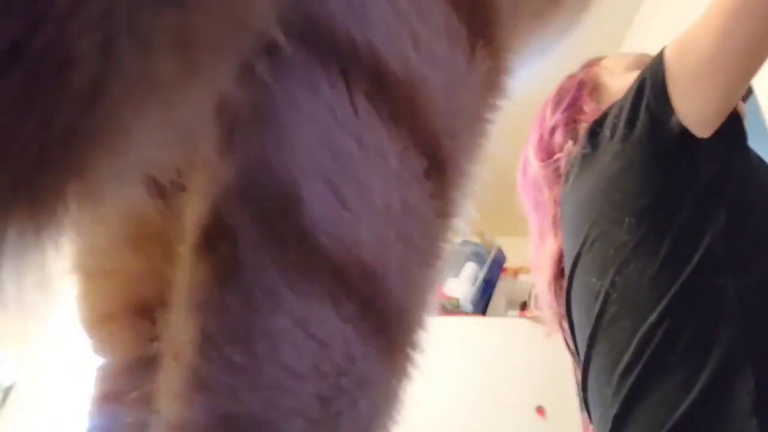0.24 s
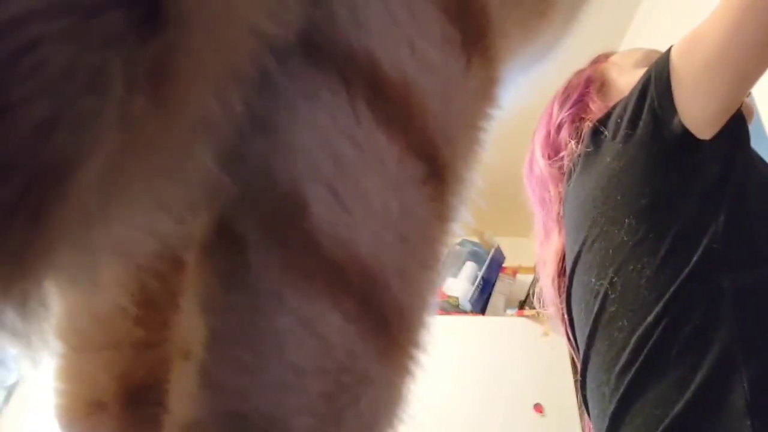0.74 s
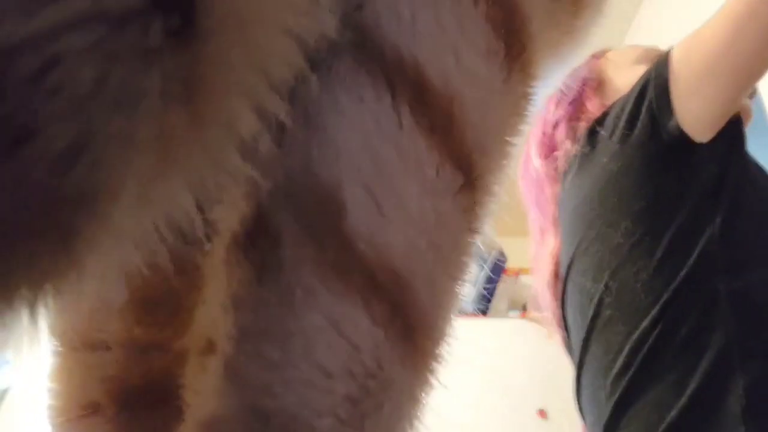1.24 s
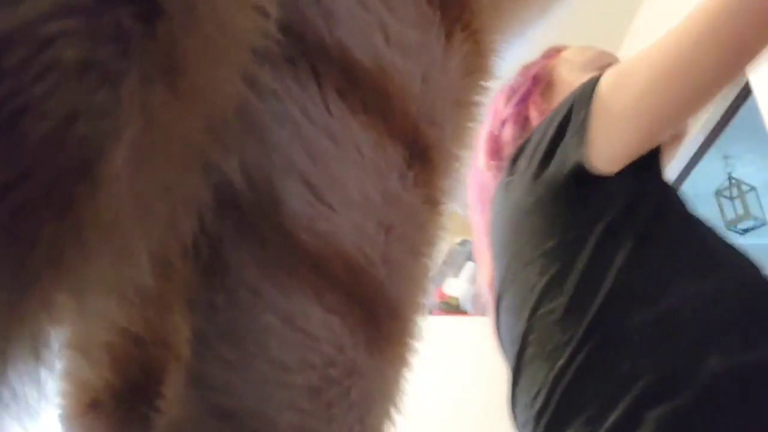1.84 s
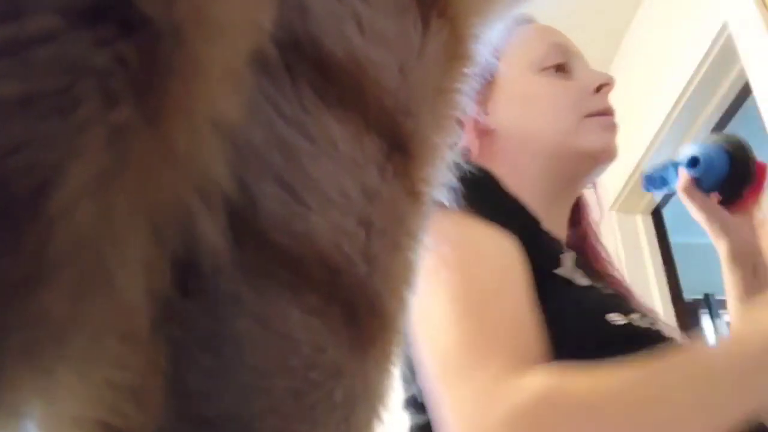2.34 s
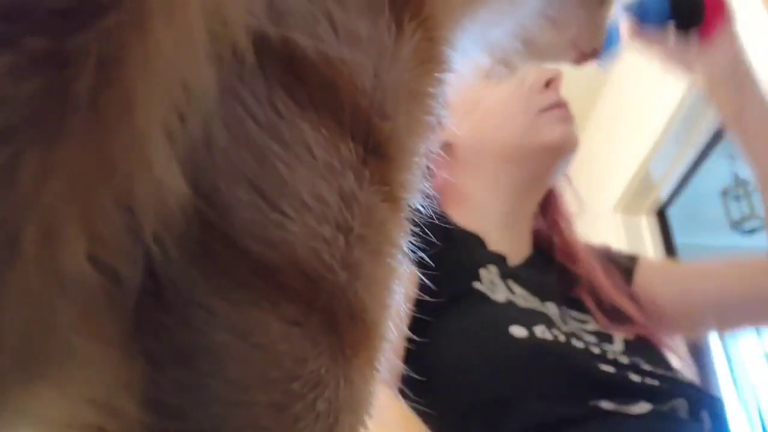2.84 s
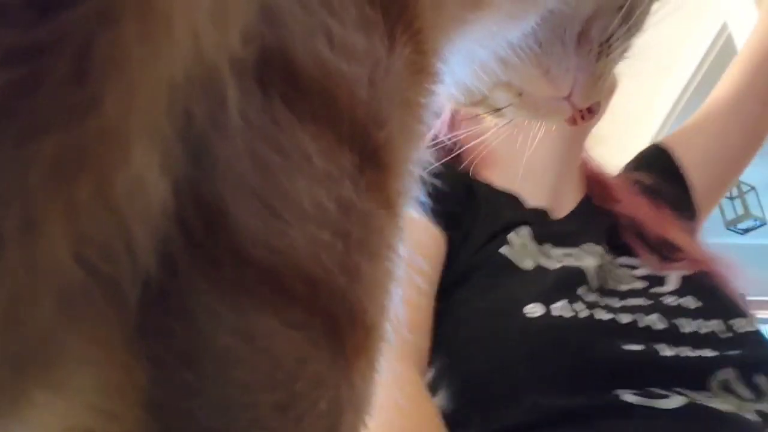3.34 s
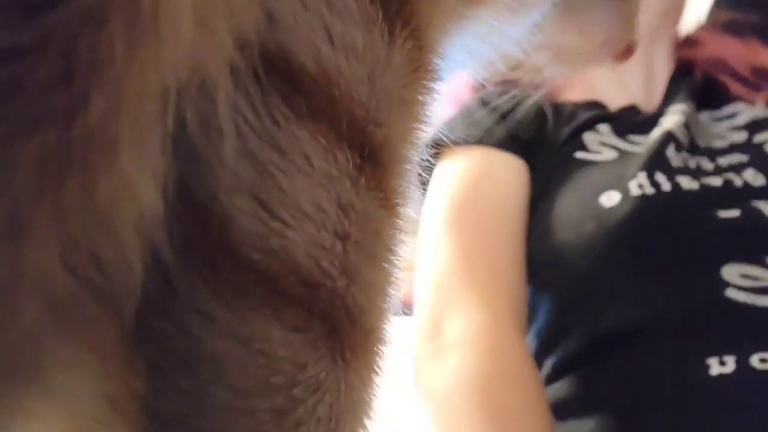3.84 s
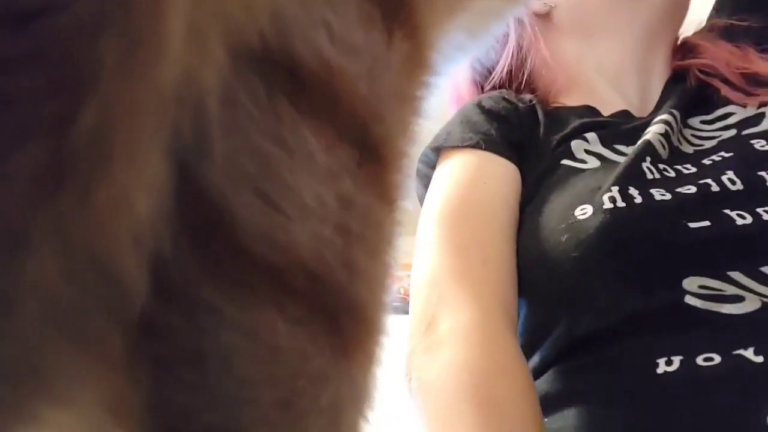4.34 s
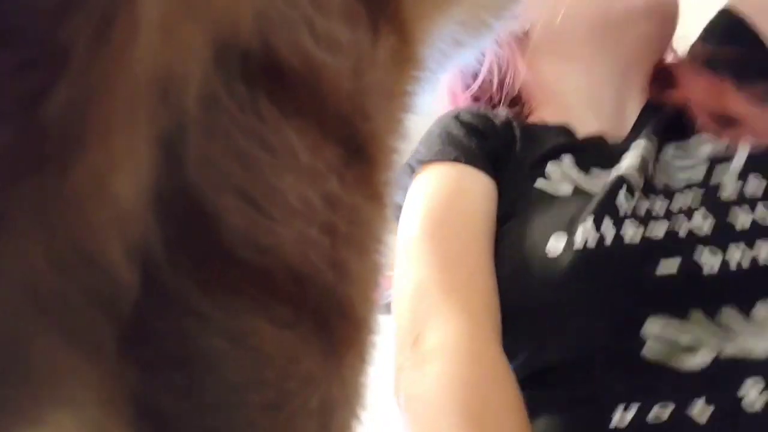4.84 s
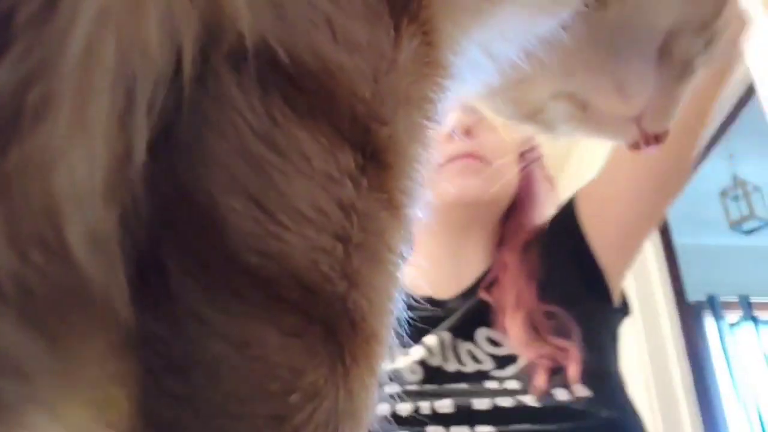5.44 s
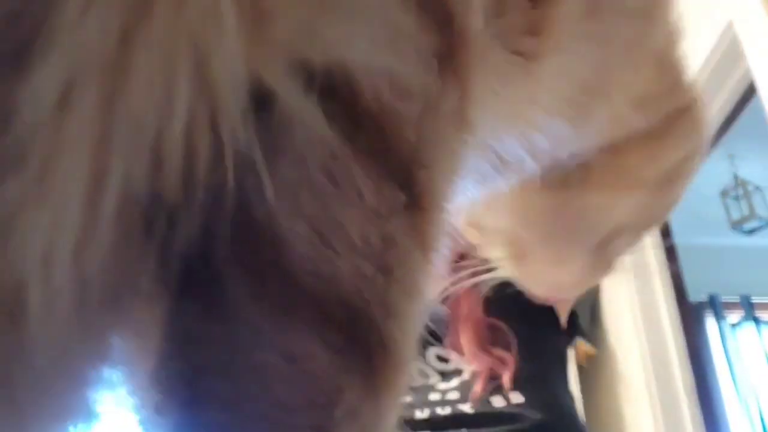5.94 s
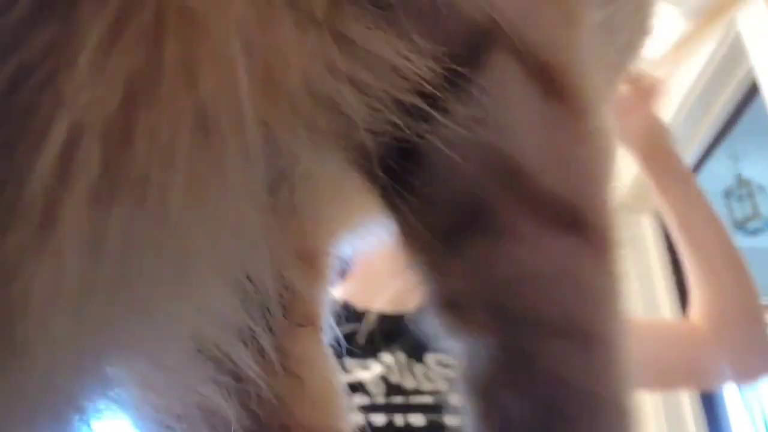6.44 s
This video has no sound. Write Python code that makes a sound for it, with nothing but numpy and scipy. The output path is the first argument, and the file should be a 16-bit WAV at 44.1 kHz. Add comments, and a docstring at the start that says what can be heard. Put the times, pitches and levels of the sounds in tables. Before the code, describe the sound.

A steady low appliance hum and rumble lie under everything in a small kitchen, with a cupboard being rummaged a step from the microphone. At about 0.5 s a cup clinks softly. From 0.35 to 1.1 s a jar is pushed along the shelf in short gritty slides, with a thin, fluttering high squeal swelling until it lands at 1.1 s in a quick hard cluster of knocks. Squeaky remnants and a glass clink follow near 1.3 s, with gentler glass taps at 1.6 and 1.8 s. A faint airy rush begins at 1.6 s and holds through a lull until about 4.3 s, with a dull tap at 2.05 s and tiny ticks. Scuffs at 4.3 s lead to a bowl knock at 4.55 s and the loudest dish clatter at 4.67 s, settling by 4.85 s. Small ticks at 5.0 s, dull wooden knocks at 5.1 and 5.4 s, then fading soft scuffs.

```python
"""Kitchen cupboard, a step from the microphone: someone rummages inside while an appliance hums throughout.
A cup clinks, a jar squeals along the shelf and is set down beside a glass; later a bowl knocks into stacked
dishes, which clatter and settle, and the wood takes dull knocks. Blows sum beating modes and a dense noise
ring; sliding is random clicks through drifting resonances; scuffs, rumble and an airy rush are shaped noise."""
import sys
import numpy as np
from scipy import signal
from scipy.fft import rfft, irfft
from scipy.io import wavfile

SR = 44100
rng = np.random.default_rng(int(sys.argv[2]) if len(sys.argv) > 2 else 0)


def inscribe(sig):
    """Save sig as 16-bit PCM at rate SR to the path in sys.argv[1].

    A 1-D sig is mono; a 2-D sig holds one channel per row.
    Samples are clipped to [-1, 1] before scaling.
    """
    pcm = np.round(np.clip(np.atleast_2d(sig).T, -1, 1) * 32767)
    wavfile.write(sys.argv[1], SR, pcm.astype(np.int16))


N = 294588
TIME = np.arange(N) / SR
EDGE_HZ = 15900  # upper band limit


def amp(db):
    """Decibels to gain."""
    return 10 ** (np.asarray(db) / 20)


def evened(x):
    """Scales to an rms of one."""
    return x / np.sqrt(np.mean(x ** 2) + 1e-20)


def struck(x, attack_samples=1100):
    """Scales a blow so that its attack has an rms of one."""
    return x / np.sqrt(np.mean(x[:, :attack_samples] ** 2) + 1e-20)


def read(points, hz):
    """Reads a table on a log-frequency axis."""
    f, value = np.transpose(points)
    return np.interp(np.log(hz + 1), np.log(f + 1), value)


def add(mix, start_s, sound):
    """Mixes in a stereo sound at its start time."""
    part = mix[:, max(round(start_s * SR), 0):][:, :sound.shape[1]]
    part += sound[:, :part.shape[1]]


def wander(size, order):
    """Smooth chance of rms one, changing over about `order` steps."""
    return evened(signal.oaconvolve(rng.standard_normal(size), signal.windows.hann(order), "same"))


def stroke(start_s, length_s, db, rise_s, release_s):
    """Gain of one movement: builds up linearly, holds to the end of its length, dies away exponentially."""
    attack = np.clip((TIME - start_s) / rise_s, 0, 1)
    return amp(db) * attack * np.exp(-np.maximum(TIME - start_s - length_s, 0) / release_s)


# left-right likeness of the microphone pair: [f/Hz, correlation]
LIKENESS = [(100, .99), (350, .96), (700, .8), (1500, .5), (4000, .3), (12000, .1)]


def paired(x, colour):
    """Colours two unrelated signals and makes them alike in the bass, as two close ports hear a room."""
    hz = np.fft.rfftfreq(x.shape[1], 1 / SR)
    a, b = rfft(x)
    same = np.clip(read(LIKENESS, hz), -1, 1)
    mid, side = a * np.sqrt(1 + same), b * np.sqrt(1 - same)
    ports = np.array([mid + side, mid - side])
    return evened(irfft(ports * amp(read(colour, hz)), x.shape[1]))


def noise(colour):
    """Steady stereo noise of a given spectrum."""
    return paired(rng.standard_normal((2, N)), colour)


# how far minor modes stand out; in the bass, well spaced, only the main ones count: [f/Hz, rms depth/dB]
MINOR_MODE_DB = [(200, 1.5), (1500, 4), (3500, 6.2), (12000, 7)]


def crowd(size=32768, order=48):
    """Gain over frequency of the many narrow minor modes that one thing owns."""
    depth_db = read(MINOR_MODE_DB, np.fft.rfftfreq(size, 1 / SR))
    return amp(depth_db * np.clip(wander(size // 2 + 1, order), -2, 2))


# decay inside the cupboard, before each thing's damping factor: [f/Hz, t60/s]
CUPBOARD_T60 = [(100, 0.3), (400, 0.2), (1500, 0.19), (5000, 0.092), (12000, 0.16)]
# decay out in the kitchen: [f/Hz, t60/s]
KITCHEN_T60 = [(150, 0.72), (1000, 0.49), (4000, 0.49), (12000, 0.27)]


def wash(colour, minor_modes, damping, room_db, size=32768):
    """Crowded modes and reflections: a quick cupboard decay, then the kitchen's faint tail."""
    source = paired(rng.standard_normal((2, size)), colour)
    steady = irfft(rfft(source) * minor_modes)
    hz, t, spectrum = signal.stft(steady, SR, nperseg=256)
    near = amp(-60 * t / (damping * read(CUPBOARD_T60, hz)[:, None]))
    far = amp(-60 * t / read(KITCHEN_T60, hz)[:, None])
    decay = np.hypot(near, amp(room_db) * far)
    return signal.istft(spectrum * decay, SR, nperseg=256)[1][:, :size]


def ring(modes, t, scatter_db=2.0, damping=1, split_hz=9):
    """Dying modes in close pairs that beat, as nothing is quite round; each blow shares its energy differently."""
    hz, db, t60 = np.transpose(modes + modes)[:, :, None]
    hz = hz + split_hz * rng.uniform(-1, 1, hz.shape)
    phase = 2 * np.pi * rng.random(hz.shape)
    # phase offset that gives the pair its likeness
    apart = np.arccos(np.clip(read(LIKENESS, hz), -1, 1)) / 2
    decay = np.exp(-np.log(1000) * t / (damping * t60))
    height = amp(db + scatter_db * rng.standard_normal(hz.shape)) * decay
    angle = 2 * np.pi * hz * t + phase
    return np.array([(height * np.sin(angle + side * apart)).sum(0) for side in (-1, 1)])


def crack(t, height=0.94, fall_s=0.0028):
    """The direct sound of the contact stands above the reflections for a few milliseconds."""
    return 1 + height * np.exp(-t / fall_s)


# crossovers between bass, body, clack and treble: [f/Hz]
BAND_EDGES_HZ = [370, 1100, 2600]


def blows(rows, modes, colour, ring_db, damping, room_db, body_db, bass_db, clack_db, treble_db, rise_s):
    """Blows on one thing: weight sets the bass, hardness the clack and treble; the bass builds up slowest."""
    out, minor_modes = np.zeros((2, N)), crowd()
    edges = [25, *BAND_EDGES_HZ, EDGE_HZ]
    bands = [signal.butter(4, pair, "band", fs=SR, output="sos") for pair in zip(edges, edges[1:])]
    rises_s = 3 * rise_s, rise_s, rise_s, rise_s
    for start_s, body, bass, treble in rows:
        dense = wash(colour, minor_modes, damping, room_db)
        t = np.arange(dense.shape[1]) / SR
        sound = struck(dense * crack(t)) + amp(ring_db) * struck(ring(modes, t))
        # the *_db arguments trim the row levels
        levels_db = bass + bass_db, body + body_db, (body + treble) / 2 + clack_db, treble + treble_db
        for band, db, swell_s in zip(bands, levels_db, rises_s):
            part = signal.sosfilt(band, sound) * (1 - np.exp(-t / swell_s))
            add(out, start_s, amp(db) * struck(part))
    return out


def slips(per_s, spread_db):
    """Stick-slip friction: random tiny clicks of uneven size."""
    size = amp(spread_db * np.minimum(rng.exponential(1, N), 3))
    happens = rng.random(N) < per_s / SR
    return size * happens * rng.standard_normal(N)


def echoed(x, colour, room_db):
    """A coloured sound after cupboard and kitchen have thrown it about; its response fades in over about a
    millisecond."""
    response = wash(colour, 1, 0.92, room_db)
    soft = 1 - np.exp(-(TIME[:response.shape[1]] / .001) ** 2)
    return evened(signal.fftconvolve(x[None], response * soft, axes=1)[:, :N])


def resonate(x, hz, width_hz):
    """A resonance of gain one that follows the curve hz: shift to zero, smooth, shift back."""
    turn = np.exp(2j * np.pi * np.cumsum(hz) / SR)
    r = np.exp(-np.pi * width_hz / SR)
    return 2 * (turn * signal.lfilter([1 - r], [1, -r], x / turn)).real


# rumble colour: [f/Hz, relative level/dB per Hz]
FLOOR = [(13, -44), (22, -11.5), (38, -2), (118, -2.5), (169, -16), (269, -22.5), (354, -27.5),
         (705, -36.5), (850, -48), (1200, -43.5), (1610, -52), (3120, -56), (15800, -67.5)]
FLOOR_DB = -46.5


def rumble():
    """Appliance rumble: steady noise, strongest in the bass."""
    return amp(FLOOR_DB) * noise(FLOOR)


# appliance tones: [f/Hz, rms level/dB]
HUM = [(48.4, -55), (118.4, -54)]


def hum():
    """Appliance hum: steady sines of random phase."""
    return sum(amp(db) * np.sqrt(2) * np.sin(2 * np.pi * (hz * TIME + rng.random())) for hz, db in HUM)


# airy rush colour: [f/Hz, relative level/dB per Hz]
RUSH_COLOUR = [(130, -26.5), (220, 8), (300, 1.5), (560, 1.5), (700, -4), (1000, -23), (2000, -50.5)]
RUSH_START_S, RUSH_LENGTH_S, RUSH_DB = 1.6, 2.7, -61.5
RUSH_RISE_S, RUSH_RELEASE_S = 0.21, 0.12


def rush():
    """Soft airy noise that sets in during the lull and holds steady."""
    gain = stroke(RUSH_START_S, RUSH_LENGTH_S, RUSH_DB, RUSH_RISE_S, RUSH_RELEASE_S)
    return gain * noise(RUSH_COLOUR)


# scuffing colour: [f/Hz, relative level/dB per Hz]
SHUFFLE_COLOUR = [(180, -37.5), (300, -11.5), (556, 1), (1260, -13.5), (1660, -10), (2160, -21.5),
                  (3090, -14.5), (6470, -28), (8290, -43), (12000, -37), (15600, -48)]
# things brushed and shifted by hand: [t/s, length/s, body level/dB, hiss level/dB]
SCUFFS = [(0.0, 0.054, -82, -57), (2.094, 0.088, -74, -73.5), (3.051, 0.11, -68.5, -78),
          (4.185, 0.1, -64.5, -70.5), (4.334, 0.093, -49, -50), (4.44, 0.038, -72, -49.5),
          (4.507, 0.046, -50.5, -38.5), (5.309, 0.039, -54, -77), (5.427, 0.1, -50.5, -57.5),
          (5.711, 0.072, -57.5, -67.5), (5.791, 0.18, -64, -60), (5.974, 0.12, -71, -63),
          (6.316, 0.044, -64, -79)]
HANDLING_DB = -77.5  # mean level of the faint rustle under the scuffs
SCUFF_RISE_SHARE, SCUFF_RELEASE_SHARE = 0.71, 0.13  # of length: slow movements start and stop slowly
HISS_ABOVE_HZ = 2300


def shuffle(uneven_db=3):
    """Soft scuffing as things are taken hold of and pushed aside, over a faint uneven rustle."""
    friction = echoed(slips(per_s=450, spread_db=3), SHUFFLE_COLOUR, room_db=-10)
    body = signal.sosfiltfilt(signal.butter(4, HISS_ABOVE_HZ, fs=SR, output="sos"), friction)
    hiss = friction - body
    out = amp(HANDLING_DB + uneven_db * wander(N, order=12000)) * friction
    for start_s, length_s, body_db, hiss_db in SCUFFS:
        rise_s, release_s = SCUFF_RISE_SHARE * length_s, SCUFF_RELEASE_SHARE * length_s
        effort = stroke(start_s, length_s, body_db, rise_s, release_s)
        out = out + effort * (body + amp(hiss_db - body_db) * hiss)
    return out


# glazed things nudged: [t/s, level/dB before swell, f/Hz, length/s]
RUBS = [(0.0, -62.5, 1180, 0.076), (2.093, -70.5, 1124, 0.13), (4.279, -58.5, 1085, 0.067),
        (4.339, -50, 645, 0.052), (4.345, -48.5, 970, 0.053), (4.436, -48, 1680, 0.05),
        (5.021, -46.5, 3180, 0.021), (5.462, -66, 1010, 0.096)]


def rubs(width_share=0.058):
    """Friction sings briefly in one broad resonance."""
    out = np.zeros((2, N))
    for start_s, db, hz, length_s in RUBS:
        t = TIME[:int(length_s * SR)]
        pitch, width_hz = np.full(len(t), hz), width_share * hz
        tones = []
        for port in range(2):
            once = resonate(rng.standard_normal(len(t)), pitch, width_hz)
            tones.append(resonate(once, pitch, 2 * width_hz))
        tone = np.array(tones)
        leaked = tone + tone[::-1] / 2  # each port shares half the other
        add(out, start_s, amp(db) * evened(leaked) * np.sin(np.pi * t / length_s))
    return out


# light ticks, levels before trim: [t/s, body level/dB, bass level/dB, treble level/dB]
UTENSIL_BLOWS = [(0.652, -85, -74, -66.5), (3.128, -67, -85, -76.5), (3.9, -63, -82, -76.5),
                 (4.17, -73, -86.5, -72.5), (5.025, -49.5, -73, -54.5), (5.047, -55, -50, -54),
                 (5.607, -77.5, -64.5, -67.5), (5.685, -57.5, -77.5, -68.5)]
# modes: [f/Hz, relative level/dB, t60/s]
UTENSIL = [(1500, 10.5, 0.133), (3024, 20, 0.057), (3200, 4, 0.145), (5960, 3, 0.017)]
# dense ring: [f/Hz, relative level/dB per Hz]
UTENSIL_WASH = [(100, -11.5), (1000, -3), (3300, 6), (6500, 2), (8000, -15.5), (15000, -8)]


def utensils():
    """Small utensils tick: light blows with a very quick rise."""
    return blows(UTENSIL_BLOWS, UTENSIL, UTENSIL_WASH, ring_db=-2.5, damping=0.94, room_db=-16.0,
                 body_db=-10.5, bass_db=-4.0, clack_db=-14.5, treble_db=-2.5, rise_s=0.00078)


# weight landing on the boards: [t/s, peak level/dB, f/Hz, length/s]
THUMPS = [(1.099, -35, 172, 0.09), (1.103, -33.5, 236, 0.08), (2.581, -34, 94.7, 0.026),
          (4.703, -15.5, 198, 0.034), (4.704, -16, 288, 0.055), (4.708, -28, 130.4, 0.094),
          (5.136, -25.5, 65.7, 0.094), (5.352, -18.5, 103.3, 0.063), (5.752, -32.5, 69.2, 0.079)]


def thumps(skew=0.7):
    """A board takes the load, swings and is stopped by what rests on it."""
    out = np.zeros((2, N))
    for start_s, db, hz, length_s in THUMPS:
        t = TIME[:int(length_s * SR)]
        swell = np.sin(np.pi * (t / length_s) ** skew) ** 2
        swing = amp(db) * swell * np.sin(2 * np.pi * hz * t)
        add(out, start_s, np.array([swing, swing]))
    return out


# knocks on the woodwork, levels before trim: [t/s, body level/dB, bass level/dB, treble level/dB]
WOOD_BLOWS = [(2.047, -44, -49.5, -69), (5.127, -32.5, -31.5, -46.5), (5.356, -27.5, -29, -49),
              (5.366, -26.5, -30, -40), (5.398, -35.5, -44, -47.5), (6.303, -64, -49.5, -77)]
# shelf modes: [f/Hz, relative level/dB, t60/s]
SHELF = [(389, -1, 0.1), (525.6, 9.5, 0.2), (653, 3, 0.13), (778.6, 1, 0.19)]
# dense ring: [f/Hz, relative level/dB per Hz]
WOOD_WASH = [(35, -37), (60, 7), (152, -6.5), (236, -5), (688, -11.5), (976, -30), (2470, -41), (4030, -39),
             (7720, -53.5), (15500, -67)]


def wood():
    """The wood knocks dully: weak shelf modes under a low dense ring."""
    return blows(WOOD_BLOWS, SHELF, WOOD_WASH, ring_db=-12.5, damping=0.58, room_db=-13.5,
                 body_db=-9.5, bass_db=-1.0, clack_db=-13.0, treble_db=-10.5, rise_s=0.0037)


# cup blows, levels before trim: [t/s, body level/dB, bass level/dB, treble level/dB]
CUP_BLOWS = [(0.522, -24.5, -39, -49)]
# modes: [f/Hz, relative level/dB, t60/s]
CUP = [(511, -3, .2), (877, -9, .33), (1163, -14, .2), (1384, 2, .27), (1410, -2, .13), (2315, -11, .18),
       (2778, -13, .21), (3133, -11, .15), (4700, -14, .16)]
# dense ring: [f/Hz, relative level/dB per Hz]
CUP_WASH = [(59, -41.5), (100, -4.5), (519, -8), (830, -7), (1060, -20), (1370, -2), (1690, -24.5),
            (2320, -23), (2900, -18), (15500, -64.5)]


def cup():
    """The cup clinks: modes and dense ring equally strong."""
    return blows(CUP_BLOWS, CUP, CUP_WASH, ring_db=0.0, damping=0.76, room_db=-16.0,
                 body_db=-14.5, bass_db=-3.0, clack_db=1.5, treble_db=-0.5, rise_s=0.0044)


# resonances of the sliding jar: [f/Hz, width/Hz, relative level/dB]
SLIDE_RING = [(506, 80, 2), (800, 250, -9), (1180, 100, -12), (1440, 90, 0), (2770, 110, -14),
              (3120, 160, -15), (4100, 150, -22), (5100, 300, -22), (7120, 140, -22)]
# pushes along the shelf: [t/s, length/s, level/dB]
PUSHES = [(0.347, 0.19, -58), (0.678, 0.21, -54), (0.902, 0.18, -51)]
PUSH_RISE_S, PUSH_RELEASE_S = 0.116, 0.012


def slide(drift=0.0071, catch_db=4, grit_db=-26):
    """The jar's foot catches on the shelf; each resonance drifts and swells as the contact shifts."""
    drive = slips(per_s=700, spread_db=3.5)
    sung = amp(grit_db) * drive
    for hz, width_hz, db in SLIDE_RING:
        pitch = hz * (1 + drift * wander(N, order=5000))
        swell = amp(db + catch_db * wander(N, order=1800))
        sung = sung + swell * resonate(resonate(drive, pitch, width_hz), pitch, 2 * width_hz)
    effort = sum(stroke(*push, PUSH_RISE_S, PUSH_RELEASE_S) for push in PUSHES)
    colour = [(150, -15), (450, 0), (5000, 0), (7200, -3), (8500, -18)]  # f/Hz, dB per Hz
    return effort * echoed(sung, colour, room_db=-14)


# one curve per squeal, before jitter and trim: [t/s, f/Hz, level/dB]
SQUEALS = [
    [(0.33, 4795, -82), (0.444, 4680, -66.5), (0.498, 4768, -88), (0.51, 4767, -75)],
    [(0.65, 4710, -75), (0.745, 4670, -59.5), (0.916, 4860, -79), (0.95, 4750, -52), (0.996, 4700, -68.5),
     (1.072, 4745, -54.5), (1.085, 4730, -39)],
    [(1.17, 4720, -50), (1.27, 4690, -92), (1.286, 4790, -65), (1.375, 4670, -86), (1.392, 4790, -55),
     (1.42, 4900, -72)],
    [(2.39, 4940, -91), (2.5, 5030, -81)],
]


def squeal(trim_db=-1, jitter=0.006, flutter_db=4.0):
    """The jar sings as it slides: one high tone that flutters with the grip of its foot."""
    out = np.zeros((2, N))
    for curve in SQUEALS:
        s, hz, db = np.transpose(curve)
        t = np.arange(s[0], s[-1], 1 / SR)
        pitch = np.interp(t, s, hz) * (1 + jitter * wander(len(t), order=200))
        grip = evened(amp(flutter_db * wander(len(t), order=260))) * signal.windows.tukey(len(t), .1)
        tone = np.sqrt(2) * np.sin(2 * np.pi * np.cumsum(pitch) / SR)
        level = amp(trim_db + np.interp(t, s, db))
        add(out, s[0], np.array([tone, tone]) * grip * level)
    return out


# jar blows, levels before trim: [t/s, body level/dB, bass level/dB, treble level/dB]
JAR_BLOWS = [(1.076, -38, -38.5, -42.5), (1.0865, -15, -22, -19.5), (1.091, -15.5, -25, -14.5),
             (1.102, -16.5, -29, -20.5), (1.117, -28, -32, -32.5), (1.286, -31.5, -32, -43),
             (1.388, -39, -65.5, -63)]
# modes: [f/Hz, relative level/dB, t60/s]
JAR = [(517, -1, .22), (705, -3, .3), (829, -6, .3), (1190, -6, .2), (1340, 3, .17), (1604, -2, .18),
       (2730, -11, .17), (2923, -8, .21), (3182, -9, .17), (3700, -13, .16), (4086, -10, .14),
       (4778, 9, .075), (5300, -8, .11)]
# dense ring: [f/Hz, relative level/dB per Hz]
JAR_WASH = [(50, -27), (110, -3.5), (200, 4.5), (420, -4.5), (680, 12.5), (1050, -8.5), (1400, -15),
            (1900, -13), (2450, -24), (2900, -10), (3500, -18), (4900, -7), (6400, -23.5), (10500, -32),
            (15500, -38.5)]


def jar():
    """The jar is set down: a quick run of blows on its modes and dense ring."""
    return blows(JAR_BLOWS, JAR, JAR_WASH, ring_db=-1.0, damping=1.0, room_db=-18.5,
                 body_db=-12.0, bass_db=-1.5, clack_db=-11.0, treble_db=-8.5, rise_s=0.0014)


# glass blows, levels before trim: [t/s, body level/dB, bass level/dB, treble level/dB]
GLASS_BLOWS = [(1.273, -31, -49, -50), (1.286, -18.5, -55, -36), (1.63, -28, -38.5, -47.5),
               (1.809, -25, -34, -38.5)]
# modes: [f/Hz, relative level/dB, t60/s]
GLASS = [(511, 0, .15), (690, -2, .14), (877, -11, .25), (1400, -9, .12), (2842, -16, .13), (4867, -19, .1)]
# dense ring: [f/Hz, relative level/dB per Hz]
GLASS_WASH = [(100, -7), (650, -3.5), (1400, -6), (2200, -12.5), (3000, -12), (5000, -20.5), (7000, -34),
              (8500, -47)]


def glass():
    """The glass rings: modes well above the dense ring."""
    return blows(GLASS_BLOWS, GLASS, GLASS_WASH, ring_db=8.0, damping=1.0, room_db=-11,
                 body_db=-15.5, bass_db=-6, clack_db=-29.5, treble_db=-11.5, rise_s=0.0018)


# bowl blows, levels before trim: [t/s, body level/dB, bass level/dB, treble level/dB]
BOWL_BLOWS = [(4.547, -22, -10.5, -24.5), (4.554, -12, -25.5, -22.5), (4.613, -16, -46, -29.5)]
# modes: [f/Hz, relative level/dB, t60/s]
BOWL = [(285, -3, .2), (929, -4, .33), (1476, 0, .24), (1938, -10, .08), (3010, -9, .13), (3200, -12, .17),
        (3768, -11, .13), (4092, -12, .16), (4760, -15, .16), (5540, -11, .11), (6700, -7, .08)]
# dense ring: [f/Hz, relative level/dB per Hz]
BOWL_WASH = [(47, -46), (80, -11), (263, -7), (477, -18), (649, -6.5), (791, -13), (903, -10.5),
             (1340, -24), (1500, -13), (2090, -36.5), (3620, -23.5), (4410, -24.5), (6860, -27.5),
             (7660, -37), (15500, -43.5)]


def bowl():
    """The bowl knocks: its dense ring is damped very quickly."""
    return blows(BOWL_BLOWS, BOWL, BOWL_WASH, ring_db=-2, damping=0.12, room_db=-14.5,
                 body_db=-12.0, bass_db=-8.5, clack_db=-7.0, treble_db=-7.5, rise_s=0.0026)


# stack blows, levels before trim: [t/s, body level/dB, bass level/dB, treble level/dB]
STACK_BLOWS = [(4.363, -41, -58.5, -64), (4.451, -39.5, -65.5, -64), (4.511, -53.5, -56.5, -51.5),
               (4.662, -17, -20.5, -22), (4.6655, -2, -26, -20), (4.679, -9.5, -17.5, -20.5),
               (4.689, -12.5, -19, -27), (4.737, -13, -15.5, -41)]
# modes: [f/Hz, relative level/dB, t60/s]
STACK = [(285, -6, .25), (447, -4, .4), (795, 0, .25), (930, -7, .2), (1008, -5, .33), (1370, -4, .22),
         (1633, -3, .2), (1715, 7, .24), (1900, -4, .1), (2257, -15, .2), (2385, -9, .2), (2860, -11, .2),
         (3171, -7, .12), (3662, -7, .19), (4102, -6, .19), (4340, -9, .15), (4985, -14, .14)]
# dense ring, also under the top plate: [f/Hz, relative level/dB per Hz]
STACK_WASH = [(47, -43.5), (80, -12.5), (166, 3), (294, -2), (400, -6), (780, 2), (1100, -12), (1400, -3),
              (1750, -6), (2100, -17), (2600, -18), (4200, -17.5), (5300, -20), (7300, -33), (8300, -41),
              (15500, -44.5)]


def stack():
    """Stacked dishes clatter: many modes in a strong dense ring."""
    return blows(STACK_BLOWS, STACK, STACK_WASH, ring_db=-4.5, damping=1.0, room_db=-18.5,
                 body_db=-15.0, bass_db=-9.0, clack_db=-5.5, treble_db=-4.5, rise_s=0.0013)


# top plate blows, levels before trim: [t/s, body level/dB, bass level/dB, treble level/dB]
PLATE_BLOWS = [(4.775, -19, -30.5, -37), (4.8175, -16, -29, -29)]
# modes: [f/Hz, relative level/dB, t60/s]
PLATE = [(900, -2, .17), (1230, 3, .16), (1530, -4, .2), (2283, -14, .14), (2993, -9, .27), (3205, -4, .17),
         (3758, -8, .15), (4064, -10, .13), (4620, -11, .14)]


def plate():
    """The top plate settles: its own modes in the dense ring of the stack."""
    return blows(PLATE_BLOWS, PLATE, STACK_WASH, ring_db=-6.5, damping=1.0, room_db=-17,
                 body_db=-14, bass_db=-12.0, clack_db=-5, treble_db=-3.5, rise_s=0.0011)


# loose dishes set chattering: [t/s, length/s, reference level/dB]
RATTLES = [(1.12, 0.07, -38.5), (4.365, 0.14, -59), (4.666, 0.03, -24), (4.706, 0.09, -32.5),
           (5.362, 0.047, -44)]


def rattles(per_s=150, spread_db=5, damping=0.3, rise_s=0.00033):
    """Loose dishes chatter: a quick run of tiny damped contacts, each on a dish of another size."""
    out, t = np.zeros((2, N)), TIME[:4096]
    onset = 1 - np.exp(-(t / rise_s) ** 2)
    for start_s, length_s, db in RATTLES:
        count = max(int(length_s * per_s), 1)
        for k, (late, weight, small) in enumerate(rng.random((count, 3))):
            pitch = 1 + .3 * (small - .5)
            contact = struck(ring(PLATE + STACK, t * pitch, scatter_db=5.0, damping=damping) * onset)
            level_db = db + spread_db * (2 * weight - 2.5)
            add(out, start_s + (k + late) * length_s / count, amp(level_db) * contact)
    return out


# cupboard's balance at the microphone pair: [f/Hz, left minus right/dB]
BALANCE_DB = [(100, -1.05), (400, -1), (750, 1), (1400, -3.5), (2200, -3.5), (3200, -1.5), (4500, 5.5),
              (7000, 4), (10000, -1)]
# lead of the right port: [f/Hz, phase/rad]
PORT_PHASE = [(30, .04), (125, .15), (300, .26), (550, .9), (900, .9), (1500, .7), (2500, .6), (5000, .4)]


def scene():
    """All sources; the cupboard's sound reaches the two ports with different colours and phases."""
    background = rumble() + hum() + rush()
    handling = shuffle() + rubs() + utensils()
    boards = thumps() + wood()
    sliding = slide() + squeal()
    crockery = cup() + jar() + glass() + bowl() + stack() + plate() + rattles()
    cupboard = handling + boards + sliding + crockery
    hz = np.fft.rfftfreq(N, 1 / SR)
    lean_db = read(BALANCE_DB, hz) / 2
    ports = np.array([amp(lean_db) * np.exp(-1j * read(PORT_PHASE, hz)), amp(-lean_db)])
    return irfft(rfft(cupboard) * ports, N) + background * amp([[-.5], [.5]])


def record(dry):
    """The microphone's low cut, the full-scale limit, then the band limit."""
    heard = signal.sosfilt(signal.butter(5, 41, "high", fs=SR, output="sos"), dry)
    band_limit = signal.firwin(511, EDGE_HZ, window=("kaiser", 9), fs=SR)
    return signal.oaconvolve(np.clip(heard, -1, 1), band_limit[None], "same")


dry = scene()
out = record(dry)
inscribe(out)
```